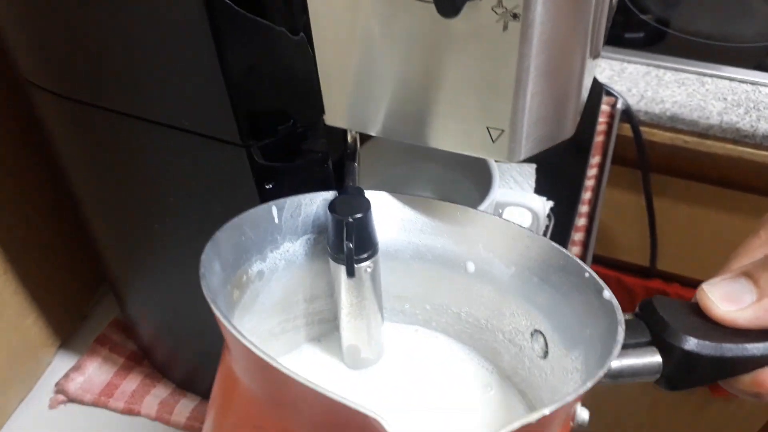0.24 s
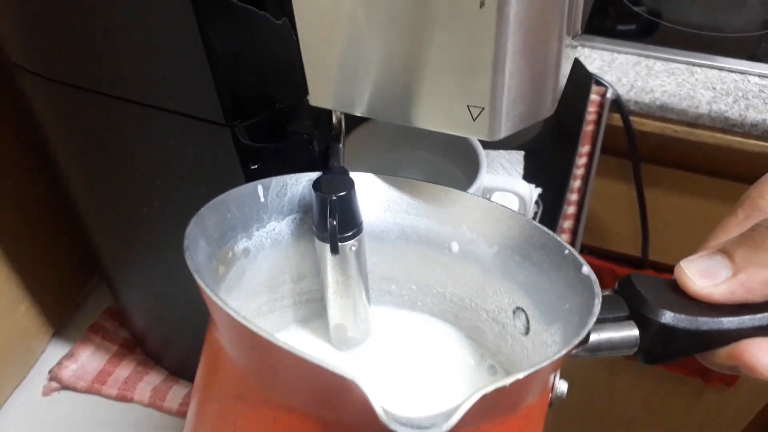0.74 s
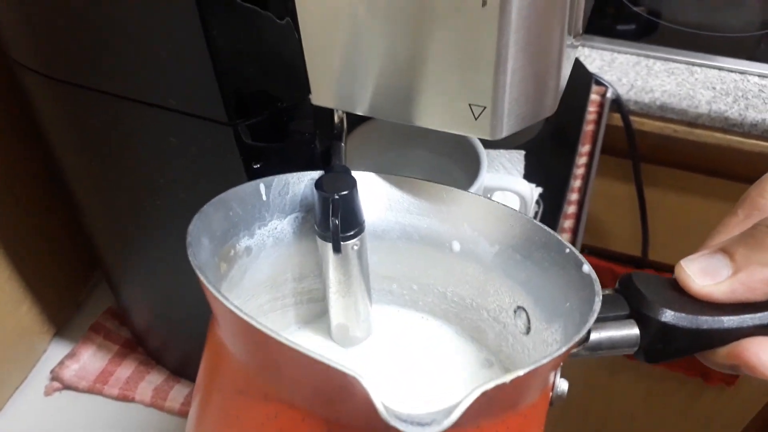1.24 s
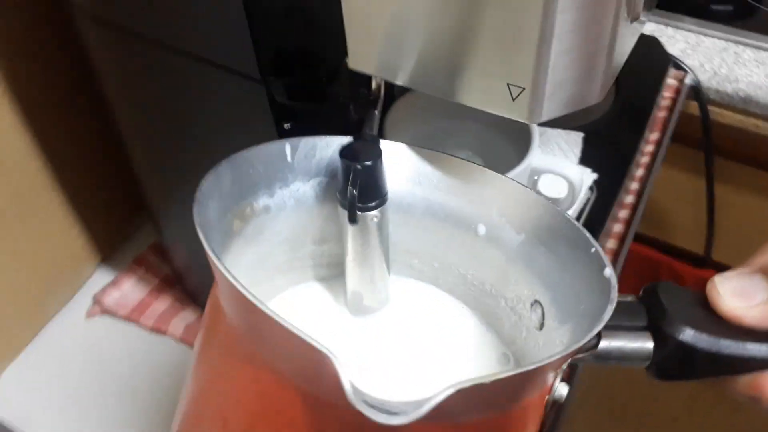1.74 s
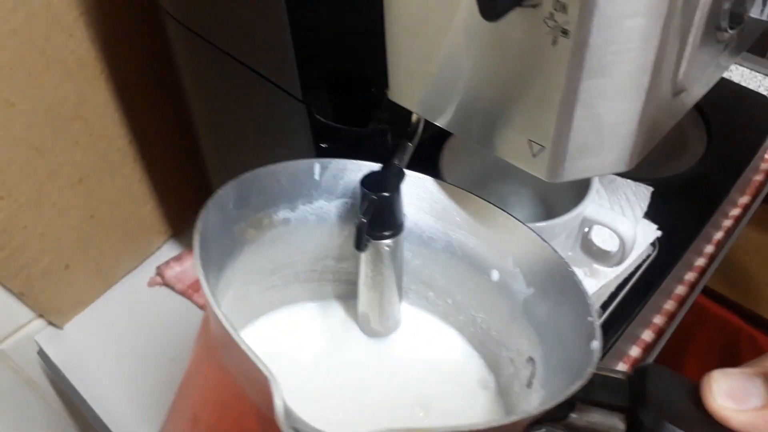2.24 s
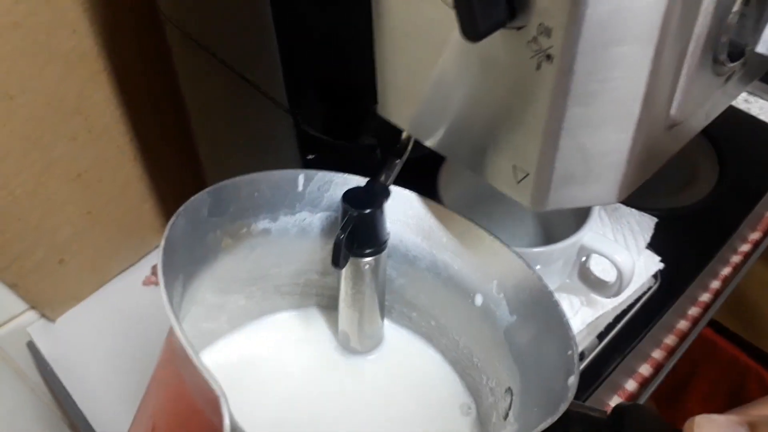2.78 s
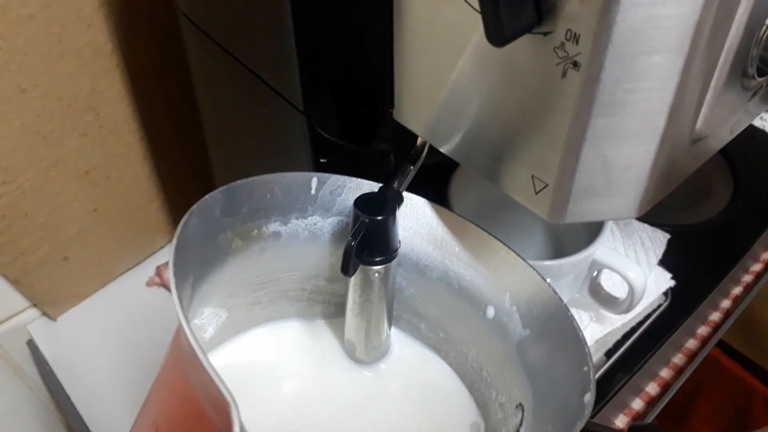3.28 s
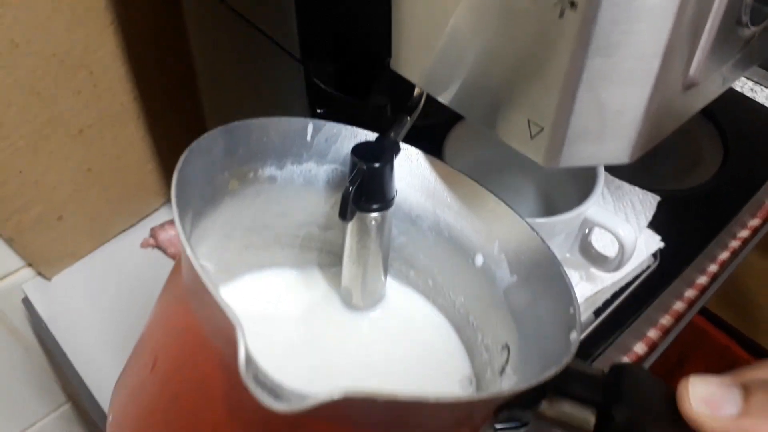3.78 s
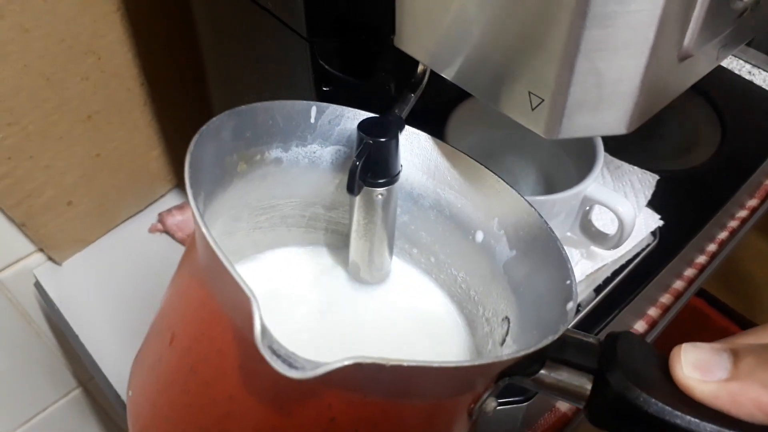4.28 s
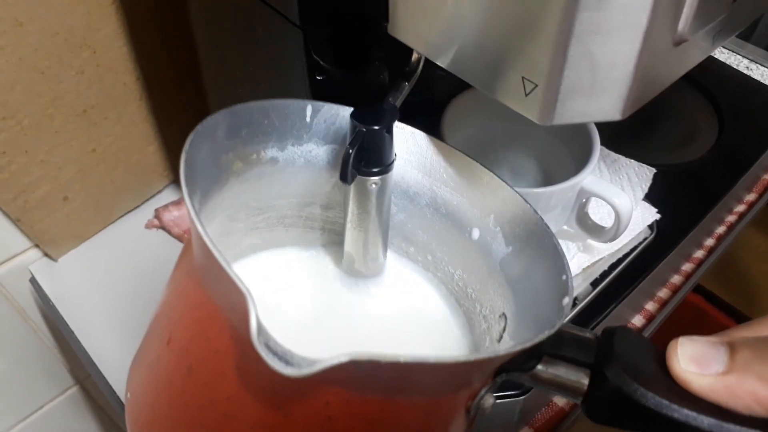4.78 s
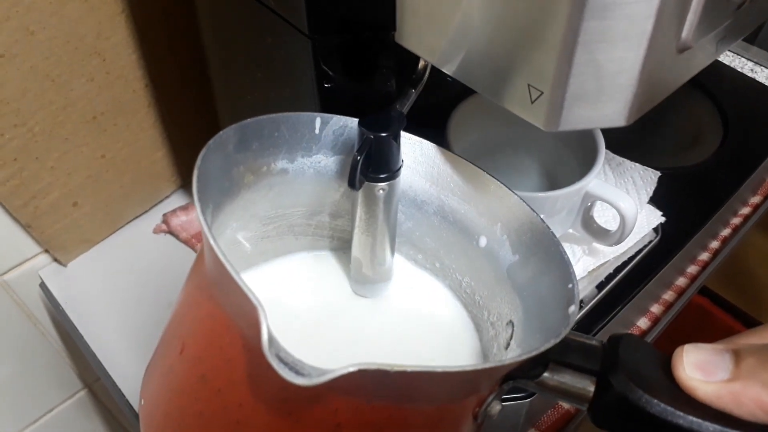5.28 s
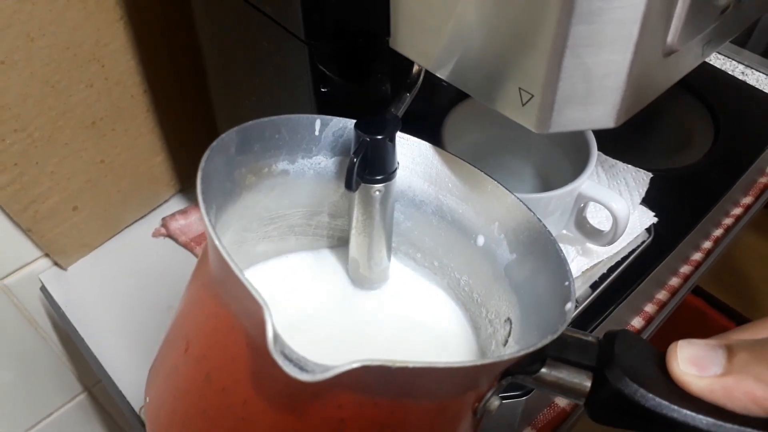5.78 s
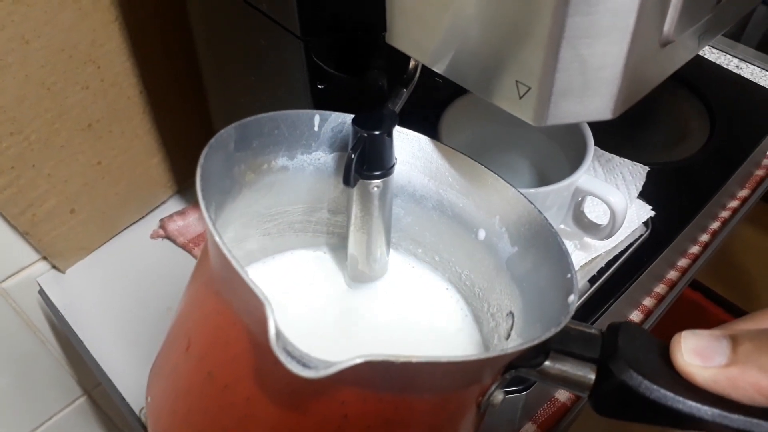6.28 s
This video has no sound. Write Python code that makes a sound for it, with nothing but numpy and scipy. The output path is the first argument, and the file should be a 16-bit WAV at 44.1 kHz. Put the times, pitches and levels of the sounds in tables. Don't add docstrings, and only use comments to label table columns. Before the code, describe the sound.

A steam wand gurgles hollowly and hisses in a metal pot of milk, bubbling loudest around four seconds, then sinking to a quieter fizz.

```python
import sys
import numpy as np
from scipy import signal
from scipy.fft import rfft, irfft, next_fast_len
from scipy.io import wavfile

SR = 44100
rng = np.random.default_rng(int(sys.argv[2]) if len(sys.argv) > 2 else 0)


def volts_from_db(level):
    exponent = np.asarray(level, float) / 20
    return 10 ** exponent


def digitize_waveform(pressure):
    field = np.atleast_2d(pressure).T
    bounded = np.clip(field, -1, 1)
    quanta = np.round(bounded * 32767).astype(np.int16)
    wavfile.write(sys.argv[1], SR, quanta)


N = 287532
TIME_S = np.arange(N) / SR
PADDED = next_fast_len(N + 8192)
BIN_HZ = np.maximum(np.fft.rfftfreq(PADDED, 1 / SR), 10)

# start_s, level_db
CHURN = [(0.0, -31), (3.94, -27), (4.18, -23), (4.9, -32.5), (6.52, -31.5)]
# start_s, cover [0-1]
FOAM = [(0, 0.06), (1.5, 0), (3.7, 0.31), (4.9, 0.55), (5.3, 0.1), (6.0, 0.86), (6.2, 0.25), (6.52, 0.92)]
# centre_s, depth_db, half_length_s
HUSHES = [(1.094, -28, 0.01), (1.31, -14.5, 0.031), (2.144, -13, 0.013), (2.682, -6, 0.024),
          (3.74, -5, 0.029), (3.88, -3, 0.03), (4.402, -10.5, 0.018), (4.745, -14, 0.021),
          (6.059, -15, 0.02), (6.34, -6.5, 0.063), (6.205, -5.5, 0.019)]
# peak_s, peak_db, pitch_hz, t60_s
BREAKING = [(.577, -10.5, 970, 0.028), (.654, -2, 746, 0.058), (.71, -8, 751, 0.051), (.9, -19, 658.4, 0.2),
            (1.208, -6, 693, 0.069), (1.244, -1.5, 712, 0.051), (1.499, -6, 739, 0.066),
            (1.861, -3.5, 703, 0.079), (1.884, -5.5, 675, 0.016), (1.964, -1, 737, 0.034),
            (2.231, -8.5, 682, 0.11), (2.254, -6.5, 893, 0.058), (2.29, -14, 975, 0.12),
            (2.38, -1, 702, 0.051), (2.502, -14, 885, 0.041), (2.843, -8, 709, 0.099),
            (2.984, -19, 962, 0.21), (3.325, -17, 800, 0.13), (3.415, 2.5, 685, 0.02),
            (3.522, -12, 672, 0.039), (3.791, -9.5, 728, 0.15), (3.916, -1, 669, 0.044),
            (3.985, -9, 782, 0.074), (4.121, 4.5, 736, 0.04), (4.298, 3.5, 699, 0.055),
            (4.781, -15.5, 664, 0.13), (4.814, -2, 660, 0.032), (4.86, -1.5, 697, 0.028),
            (4.913, -4.5, 974, 0.03), (6.149, -14, 687, 0.047)]
# peak_s, peak_db, pitch_hz, t60_s
SUNKEN = [(.11, -8.5, 761, 0.13), (.183, -10, 755, 0.017), (.286, 0.5, 675, 0.059),
          (.332, -5.5, 750, 0.062), (.358, -5.5, 750, 0.081), (.466, -14.5, 776, 0.12),
          (.804, -16.5, 726.4, 0.25), (.989, -1, 746, 0.039), (1.039, -7, 724, 0.06),
          (1.078, -8.5, 773, 0.052), (1.334, -14.5, 706.5, 0.23), (1.539, -15.5, 730.5, 0.34),
          (1.692, -7, 818, 0.03), (2.35, -9.5, 613, 0.057), (2.6, -7.5, 723, 0.12), (3.158, -7, 746, 0.033),
          (3.179, -7, 687, 0.075), (3.375, -10, 765, 0.097), (3.395, -5.5, 685, 0.031),
          (3.585, -16, 788, 0.054), (4.171, 0.5, 680, 0.016), (4.228, -6.5, 641, .1),
          (4.541, -18, 611, 0.16), (4.633, -10.5, 698, 0.04), (4.751, -10, 703, 0.034),
          (4.834, -5.5, 772, 0.046), (5.039, -3.5, 710, 0.012), (5.291, -13.5, 628, 0.1),
          (5.8, -7, 630, 0.031), (5.862, -9, 611, 0.051), (6.102, -16, 750, 0.099),
          (6.347, -6.5, 684, 0.014)]
# peak_s, peak_db, pitch_hz
BLIPS = [(0.003, -8, 732), (0.253, -23, 742), (.304, -8, 845), (.447, -15, 714), (1.011, -12, 762),
         (5.272, -20, 694), (1.112, -18, 960), (1.263, -12, 705), (1.383, -9.5, 705), (1.456, -19, 730),
         (2.033, -19, 848), (2.198, -11.5, 863), (2.723, -12, 920), (2.896, -30, 703), (3.575, -13.5, 944),
         (4.42, -17.5, 743), (5.473, -21, 630), (5.518, -17.5, 630), (5.574, -16.5, 659),
         (5.707, -20.5, 603), (5.768, -17, 629), (5.842, -27, 617), (5.924, -17, 720), (5.998, -19, 607),
         (6.407, -18.5, 699)]
# pitch_hz, width_hz, level_db
POT_AIR = [(630, 34, -7), (695.8, 28.4, 1.5), (742.5, 14, -1), (811, 60, -2.5), (858.8, 38, -0.5),
           (939, 80, -7.5), (978.5, 46, -1.5), (1035, 340, -9), (1100, 190, -17.5)]
# pitch_hz, width_hz, level_db
UNDER_FOAM = [(565, 86, -7.5), (566, 88, 0.5), (611, 103, -3)]
# centre_s, level_db
AIR_DIPS = [(.429, -10), (.533, -12), (.784, -14), (1.606, -10.5), (1.947, -12), (2.518, -3),
            (3.141, -9.5), (3.905, -6), (4.2, -6), (4.51, -1), (5.446, -11)]
# pitch_hz, width_hz, level_db
SPLASH = [(1111, 94, 8), (1245, 97, 12), (1224, 660, 15.7), (1600, 97, 12), (1670, 1450, 11.2)]
# pitch_hz, width_hz, level_db
WALL = [(1955, 130, -1.5), (2026, 59, 2), (2141, 82, -6.5)]
# peak_s, peak_db, t60_s
SWIRLS = [(.032, -10, 0.094), (.251, -23, 0.31), (.36, -24, 0.072), (.59, -14, 0.09), (.944, -20, 0.15),
          (1.196, -13.5, 0.13), (1.347, -22, 0.36), (1.812, -14.5, 0.14), (1.916, -8, 0.078),
          (2.2, -25, 0.35), (3.331, -13.5, 0.058), (3.849, -26, 0.33), (5.032, -11, 0.046),
          (5.634, -25, 0.099), (5.773, -20, 0.057)]
# start_s, level_db
FACING = [(0, 0), (1.4, 0), (2.25, -2), (2.4, -8), (3.15, -8), (3.4, -4), (4.4, -4), (6.52, -6)]

# start_s, level_db
STEAM = [(0, -31), (.7, -32), (1.25, -31.5), (2.1, -32.5), (2.5, -32), (3.2, -33.5), (3.7, -34), (4.3, -32),
         (4.45, -37.5), (4.9, -37.5), (5.25, -36.5), (5.75, -37), (6.1, -37), (6.35, -38.5), (6.52, -39)]
# pitch_hz, density_db [dB per Hz]
FIZZ_COLOUR = [(1200, -13.5), (1800, 1), (2500, 3), (3150, 7.5), (3700, 1.5), (4500, 8.5), (5700, -2),
               (6900, 2.5), (7600, 0), (8450, -11), (10300, -7), (12200, -4.5), (14000, -16), (15600, -14)]
# start_s, jump_db, length_s
SPURTS = [
    (4.59, 6, 0.031),
    (4.92, 6.5, 0.266),
    (5.32, 7, 0.051),
    (5.512, 3.5, .15),
    (6.226, 3, 0.072),
]
# peak_s, peak_db
SPUTTERS = [(.107, -21), (.444, -22), (.596, -23), (0.713, -16), (.822, -17), (.954, -11), (1.032, -14),
            (1.151, -24), (1.231, -17), (1.366, -20), (1.558, -19), (2.295, -23), (5.721, -21),
            (5.877, -16.5)]
# peak_s, peak_db
FLICKS = [
    (4.962, -14),
    (4.986, -14),
    (5.166, -25),
]
# centre_s, level_db, half_length_s
TEARS = [(.787, 4, 0.016), (1.826, 2.5, 0.016), (0.478, -4.5, .03), (1.3, -5, 0.012), (2.995, -6, 0.017),
         (5.9, -4, .03), (4.2, -5, 0.045)]
# start_s, place [0 low - 1 high]
RIM = [(0, 0.05), (1.6, 0.13), (2.1, 0.4), (2.9, 0.75), (3.7, 0.61), (4.3, 0.35), (4.9, 0.35), (5.6, 0.15),
       (6.1, 0.18), (6.52, 0.23)]

# pitch_hz, density_db [dB per Hz]
RUMBLE = [(15, -50), (25, -22), (75, -27), (156, -13), (201, 4.5), (246, -18), (301, -3), (374, -3.5),
          (520, 8.5), (680, -34), (1140, -120)]
# pitch_hz, width_hz, level_db
HUM = [(75, 14, -73), (89.5, 2, -63.5), (111, 99, -59.5), (205.5, 13, -59), (316, 27, -58.5)]
# start_s, peak_db, t60_s
BUMPS = [
    (1.39, -35.5, 0.19),
    (1.499, -41.5, 0.29),
    (2.64, -41, 0.21),
]

# peak_s, peak_db, pitch_hz
CRACKLES = [(0.0962, -39, 3220), (0.175, -30, 3410), (0.249, -28, 3130), (0.368, -25, 3210),
            (0.4276, -35, 3240), (0.5003, -47, 3030), (0.6543, -16, 2820), (0.818, -44, 3280),
            (0.9009, -28, 3000), (1.1105, -29, 3160), (1.1677, -25, 3310), (1.436, -21.5, 2900),
            (1.8113, -22, 3400), (1.9415, -20.5, 3020), (2.3176, -21.5, 2880), (2.4004, -27.5, 2980),
            (2.6334, -38, 3440), (2.937, -26.5, 3160), (3.4286, -25, 3270), (3.717, -34, 3240),
            (3.8565, -28, 3170), (4.0971, -25.5, 3130), (4.2911, -33, 2590), (4.8953, -31, 3130),
            (5.5435, -25.5, 3210)]
# peak_s, peak_db, pitch_hz
CHIRPS = [(0.0338, -23, 1750), (0.2912, -28, 1390), (0.3556, -24, 1450), (0.5801, -26, 1180),
          (0.6534, -12.5, 1370), (0.9028, -13.5, 1316), (0.9541, -19, 1270), (1.3862, -16, 1530),
          (1.4949, -16.5, 1150), (1.8128, -20.5, 1590), (1.8766, -19, 1440), (2.2543, -17, 1370),
          (2.4498, -20, 1560), (2.7763, -16, 1550), (2.8422, -5.5, 1570), (2.982, -16, 1120),
          (3.1542, -19, 1610), (3.225, -26, 1740), (3.27, -22, 1560), (3.3353, -17, 1115),
          (3.3952, -12.5, 1560), (3.4595, -14.5, 1400), (3.5143, -17, 1100), (3.7907, -16, 1140),
          (3.8487, -12.5, 1370), (3.921, -27, 1120), (3.9913, -16, 1140), (4.0726, -26, 1140),
          (4.124, -14, 1310), (4.2203, -26, 1360), (4.2956, -33, 1350), (4.794, -19, 1260),
          (4.8554, -19, 1260), (4.8938, -16.5, 1450), (5.715, -22, 1130), (6.1508, -19.5, 1140)]
# peak_s, peak_db, pitch_hz
TINKLES = [(0.0458, -24, 2120), (0.1685, -15.5, 2130), (0.2414, -32, 2550), (0.293, -27, 2440),
           (0.655, -18, 2720), (1.385, -18, 2510), (1.8726, -26, 2200), (2.1899, -24, 2300),
           (2.435, -18, 2440), (2.773, -26, 2480), (3.1537, -19, 2176), (3.2515, -15, 2190),
           (3.455, -20, 2470), (3.5952, -15, 2230), (3.7419, -31, 2300), (3.7903, -17.5, 2280),
           (3.8565, -26, 2350), (3.922, -15, 2360), (4.136, -11.5, 2160), (4.3824, -21, 2210),
           (4.821, -24, 2480), (4.8983, -19.5, 2440), (5.3263, -26, 2450), (5.6331, -20, 2200),
           (6.2547, -26, 2550)]
# peak_s, peak_db, pitch_hz
TRILLS = [(0.107, -16, 1000), (0.285, -23, 880), (0.578, -15, 1012), (0.653, -22, 865), (0.707, -9, 973),
          (0.903, -10, 950), (1.036, -27, 966), (1.111, -21, 1000), (1.332, -35, 950), (1.456, -13, 950),
          (1.873, -11, 840), (2.188, -27, 861), (2.253, -4, 940), (2.293, -23, 950), (2.717, -11, 970),
          (2.895, -20, 920), (2.984, -15, 930), (3.156, -13, 986), (3.521, -20, 885), (3.573, -23, 950),
          (3.788, -13.5, 900), (3.915, -7.5, 906), (4.228, -17, 861), (4.297, -10, 870), (4.913, -15, 1020),
          (5.767, -28, 1090)]
# peak_s, peak_db, pitch_hz
GLUGS = [(0.103, -21, 610), (1.573, -24, 595), (1.87, -20, 633), (2.223, -14, 618), (2.348, -18.5, 610),
         (2.602, -25, 565), (3.813, -22, 580), (4.125, -30, 567), (4.297, -16, 594), (4.538, -24, 580),
         (4.631, -26, 577), (5.037, -25, 604), (5.653, -20, 614), (5.704, -24, 580), (5.774, -23, 580),
         (5.843, -14.5, 607), (6.347, -25, 583), (6.491, -19, 590),
         (0.115, -33, 430), (1.499, -31, 435), (1.615, -34, 385), (1.87, -29, 412), (2.228, -33, 428),
         (2.351, -33.5, 409), (2.768, -35, 400), (3.179, -34.5, 323), (3.798, -32, 323),
         (4.172, -35.5, 416),
         (0.019, -35.5, 403), (.3, -30, 594), (.82, -17, 980), (.86, -27, 980), (4.622, -30.5, 320),
           (4.94, -37, 318), (5.979, -25, 1110)]
# start_s, peak_db, pitch_hz
SPITS = [(0.295, -21, 3070), (0.387, -17.5, 4340), (0.4352, -15, 4230), (0.689, -19, 3070),
         (0.896, -16, 3900), (5.034, -13, 4600), (2.161, -20, 4660), (2.4234, -21.5, 3020),
         (5.049, -22.5, 4600), (5.105, -20.5, 4900), (3.5314, -23, 3000), (3.652, -24, 5000),
         (3.767, -18.5, 4500), (5.176, -18, 4750), (4.5308, -27, 3350), (4.986, -17, 4700),
         (4.784, -25, 4370), (4.93, -23, 4900), (5.021, -10, 4450), (5.08, -16.5, 4750), (5.141, -15, 4730),
         (5.257, -25.5, 5000), (5.542, -21, 4600), (6.2286, -22.5, 4410)]

# pitch_hz, share [0-1]
DIRECT = [(300, .92), (700, .95), (1300, .8), (2000, .55), (5000, .42), (15000, .25)]
# pitch_hz, left_minus_right_db
SHADE = [(60, 1), (330, 3), (720, 2.5), (950, 7), (1400, 5), (2020, 11), (2500, 4), (3150, 6), (3800, -2),
         (4800, -10), (5750, 10), (7500, 0), (12300, -10), (15300, 5)]
# pitch_hz, angle_rad
LEAD = [(0, 0), (260, .3), (950, 1), (1290, .8), (1800, 1.4), (2150, 2.9), (2330, 6.5), (2700, 6.4),
        (3100, 7), (4130, 8.5), (5770, 13.4), (6800, 14.5), (8100, 15.5), (10200, 19.8), (11800, 25.7),
        (15300, 28.8)]


def rms_one(x):
    return x / np.sqrt(np.mean(x ** 2) + 1e-20)


def in_time(rows):
    return np.interp(TIME_S, *np.transpose(rows))


def at_hz(points, hz):
    pitch_hz, value = np.transpose(points)
    return np.interp(np.log(hz), np.log(pitch_hz), value)


def drift(rate_hz):
    r = np.exp(-80 * np.pi * rate_hz / SR)
    noise = rng.standard_normal(N // 40 + 2002)
    slow = signal.lfilter([1], [1, -2 * r, r * r], noise)[2000:]
    return np.interp(np.arange(N) / 40, np.arange(len(slow)), rms_one(slow))


def resonance(x, hz, width_hz):
    r = np.exp(-np.pi * width_hz / SR)
    zeros = np.array([1, 0, -1]) * (1 - r * r) / 2
    return signal.lfilter(zeros, [1, -2 * r * np.cos(2 * np.pi * hz / SR), r * r], x)


def grains(per_s, spread_db):
    sizes = volts_from_db(spread_db * np.minimum(rng.exponential(1, (2, N)), 3))
    signs = rng.choice([-1, 1], (2, N))
    return sizes * signs * (rng.random((2, N)) < per_s / SR) + 1e-18


def stereo(pair, hz):
    alike = np.clip(at_hz(DIRECT, hz), 0, 1)
    return np.array([pair[0], alike * pair[0] + np.sqrt(1 - alike ** 2) * pair[1]])


def modes(drive, table, patchy_db, tilt_db=0):
    out = 0
    for k, (hz, width_hz, level_db) in enumerate(table):
        rung = resonance(stereo(drive, hz), hz, 3.0 * width_hz)
        rung = resonance(rung, hz, width_hz) * np.sqrt(SR / (2 * width_hz))
        gain = volts_from_db(level_db + tilt_db * np.log2(hz / 620) + patchy_db * drift(11.0))
        out = out + (-1) ** k * gain * rung
    return out / np.sqrt(np.sum(volts_from_db(np.array(table)[:, 2]) ** 2))


def bursts(times, levels_db, t60s, rise_s):
    out, age = np.zeros(N), np.arange(int(.3 * SR)) / SR
    for s, level_db, t60 in zip(times, levels_db, t60s):
        shape = (1 - np.exp(-age / rise_s)) * volts_from_db(level_db - 60 * age / t60)
        start = int(s * SR)
        out[start:start + len(age)] += shape[:N - start]
    return out


def puffs(table, gain_db, rise_s):
    s, peak_db, t60 = np.transpose(table)
    return bursts(np.maximum(s - rise_s, 0), peak_db + gain_db, np.clip(t60, .01, .3), rise_s)


def bells(table):
    return sum(db * np.exp(-((TIME_S - s) / half) ** 2) for s, db, half in table)


def lulls(times, depth, lead_s):
    marks = np.zeros(N)
    marks[(np.maximum(times - lead_s, 0) * SR).astype(int)] = 1
    bell = np.hanning(int(2 * lead_s * SR))
    return 1 - np.clip(depth * signal.fftconvolve(marks, bell, "same"), 0, .9)


def pocket_tones(s, peak_db, pitch_hz, t60):
    tones, age = np.zeros(N), np.arange(int(.15 * SR)) / SR
    for at, level_db, hz, fade in zip((s * SR).astype(int), peak_db, pitch_hz, t60):
        swell = (1 - np.exp(-age / 0.0035)) * volts_from_db(level_db - 3.5 - 60 * age / (1.61 * fade))
        tone = swell * np.sin(2 * np.pi * hz * age * (1 - 0.5 * age))
        tones[at:at + len(age)] += tone[:N - at]
    return tones


def pot_air(s, peak_db, pitch_hz, t60, churn_db):
    foam = in_time(FOAM)
    surge = volts_from_db(churn_db - 1.0 + 0.5 * drift(17.0)) * lulls(s, depth=0.26, lead_s=0.012)
    collapses = surge * rms_one(grains(700., 4.24))
    collapses += bursts(s, peak_db - 1.5, 0.67 * t60, rise_s=0.0094) * rng.standard_normal((2, N))
    collapses[:, (s * SR).astype(int)] += volts_from_db(peak_db + 3.5)
    air = modes(collapses, POT_AIR, patchy_db=4.0, tilt_db=2 - 20 * foam)
    air = air + pocket_tones(s, peak_db, pitch_hz, t60)
    air = air + modes(collapses * volts_from_db(-25 + 34 * foam), UNDER_FOAM, patchy_db=-1.5)
    return air * volts_from_db(bells([(*row, 0.013) for row in AIR_DIPS]))


def splash(s, spill_db, t60, churn_db, small):
    gain = bursts(s, spill_db - 23, 1.33 * t60, rise_s=0.0034) + volts_from_db(churn_db - 14)
    return modes(gain * small, SPLASH, patchy_db=0.5)


def pot_wall(churn_db, small):
    swirl = volts_from_db(churn_db - 6 + in_time(FACING)) + puffs(SWIRLS, -0.91, rise_s=0.015)
    return modes(swirl * volts_from_db(1.5 * drift(25.0)) * small, WALL, patchy_db=2.2)


def gurgle():
    churn_db = in_time(CHURN) + bells(HUSHES)
    blips = [(*row, 0.089) for row in BLIPS]
    s, peak_db, pitch_hz, t60 = np.transpose(BREAKING + SUNKEN + blips)
    s = np.maximum(s - .003, 0)
    below_surface = np.arange(len(s)) >= len(BREAKING)
    spill_db = 0.43 * peak_db - 7.5 * below_surface
    small = rms_one(grains(1200., 5.7))
    out = pot_air(s, peak_db, pitch_hz, t60, churn_db)
    out = out + splash(s, spill_db, t60, churn_db, small) + pot_wall(churn_db, small)
    thump = rms_one(resonance(rng.standard_normal(N), 417, 120))
    return out + thump * bursts(s, spill_db - 27.5, 1.3 * t60, rise_s=0.024)


def spurts_db():
    rise_s, fall_s, total = 0.0028, 0.016, 0
    for s, jump_db, hold in SPURTS:
        sinking = np.exp(-np.maximum(TIME_S - s - hold, 0) / fall_s)
        total = total + jump_db * np.clip((TIME_S - s) / rise_s, 0, 1) * sinking
    return total


def past_rim(spectrum, spurt_db):
    place = np.clip(in_time(RIM), 0, 1) * 2
    filled = np.clip(.1 * spurt_db, 0, 1)
    out = filled * irfft(spectrum, PADDED)[:, :N]
    for k, notch_hz in enumerate(np.geomspace(8250, 9250, 3)):
        dip = volts_from_db(-9 * np.exp(-.5 * (np.log2(BIN_HZ / notch_hz) / .055) ** 2))
        near = np.clip(1 - abs(place - k), 0, 1)
        out += (1 - filled) * near * irfft(spectrum * dip, PADDED)[:, :N]
    return out


def fizz_levels(foam, spurt_db):
    steam_db = in_time(STEAM)
    sway_db = 1.32 * drift(14.0) + bells(TEARS)
    crackle = puffs([(s, db, 0.15) for s, db, hz in CRACKLES], -14.0, rise_s=0.0035)
    low_db = 20 * np.log10(volts_from_db(steam_db - 1 + 1.5 * foam) + crackle) + 0.3 * bells(HUSHES)
    high_db = steam_db + 3.5
    water = puffs([(*row, 0.071) for row in SPUTTERS], -4.0, rise_s=0.0033)
    water = water + puffs([(*row, 0.026) for row in FLICKS], -8.0, rise_s=.001)
    jet_db = 20 * np.log10(volts_from_db(steam_db - 0.5 + 1.5 * foam) + water)
    return low_db + 0.13 * spurt_db + sway_db, high_db + spurt_db + sway_db, jet_db + 0.81 * spurt_db


def fizz():
    foam, spurt_db = in_time(FOAM), spurts_db()
    low_db, high_db, jet_db = fizz_levels(foam, spurt_db)
    pops, dealt = grains(5000., 5.6), rng.integers(0, 20, N)
    white, sputter, out = rng.standard_normal((2, 2, N)), drift(62.0), np.zeros((2, N))
    for k, hz in enumerate(np.geomspace(1300, 15500, 20)):
        drive = rms_one(pops * (dealt == k)) * 0.5 + white[k % 2] * 0.95
        band = resonance(stereo(drive, hz), hz, 0.22 * hz)
        band = rms_one(resonance(band, hz, 0.21 * hz))
        if hz < 3600:
            level_db, patchy_db = low_db - 3.5, 2.9
        elif hz < 8400:
            level_db, patchy_db = high_db - 3.5, 2.2
        else:
            level_db, patchy_db = jet_db - 0.5 + 0.2 * sputter, 2.2
        ridge_db = 5.5 * (foam - .5) * np.exp(-(4 * np.log2(hz / 5300)) ** 2)
        wander_db = patchy_db * drift(16.0) + 0.98 * drift(1.47)
        out += np.sqrt(hz / 4000) * volts_from_db(level_db + ridge_db - 8.0 + wander_db) * band
    return past_rim(rfft(out, PADDED) * volts_from_db(at_hz(FIZZ_COLOUR, BIN_HZ)), spurt_db)


def room_rumble():
    noise = rng.standard_normal((2, PADDED))
    mid, side = irfft(rfft(noise) * volts_from_db(at_hz(RUMBLE, BIN_HZ)), PADDED)[:, :N]
    return volts_from_db(-51 - 3.0) / np.std(mid) * (mid + 0.59 * side * [[1], [-1]])


def appliance_hum():
    lines = sum(volts_from_db(db + 1.5) * rms_one(resonance(rng.standard_normal(N), f, w)) for f, w, db in HUM)
    turn, motor_hz, beat_hz = 2 * np.pi * TIME_S, 58.2, .955
    swell = 1 + .6 * np.cos(turn / 5.3)
    motors = np.sin(motor_hz * turn) + .85 * np.sin((motor_hz + beat_hz) * turn)
    return lines + volts_from_db(-64.0) * swell * motors


def handle_bumps():
    s, peak_db, t60 = np.transpose(BUMPS)
    thud = rms_one(resonance(rng.standard_normal(N), 97, 120))
    return thud * bursts(s, peak_db + 4.0, t60, rise_s=0.012)


def kitchen_floor():
    return (room_rumble() + appliance_hum() + handle_bumps()) * volts_from_db([[.6], [-.6]])


def ringing_bubbles(table, gain_db, rise_s, t60, width):
    out, age = np.zeros((2, N + 4000)), np.arange(4000) / SR
    swell = (1 - np.exp(-age / rise_s)) * volts_from_db(gain_db - 60 * age / t60)
    for (s, level_db, hz), puff in zip(table, rng.standard_normal((len(table), 2, len(age)))):
        at = int(max(s - rise_s, 0) * SR)
        rung = resonance(stereo(puff, hz), hz, width * hz)
        rung = rms_one(resonance(rung, hz, 3 * width * hz))
        out[:, at:at + len(age)] += volts_from_db(level_db) * swell * rung
    return out[:, :N]


def froth():
    large = ringing_bubbles(GLUGS, gain_db=0.5, rise_s=0.0058, t60=0.11, width=0.048)
    middle = ringing_bubbles(CHIRPS + TINKLES + TRILLS, gain_db=-1.5, rise_s=0.002, t60=0.056, width=0.045)
    return large + middle + ringing_bubbles(CRACKLES, gain_db=0.5, rise_s=0.011, t60=0.15, width=0.017)


def spits():
    out, age = np.zeros(N), np.arange(900) / SR
    for (s, level_db, hz), puff in zip(SPITS, rng.standard_normal((len(SPITS), len(age)))):
        at = int(s * SR)
        swell = (1 - np.exp(-age / 0.00014)) * volts_from_db(level_db + 1.5 - 60 * age / 0.026)
        drop = swell * rms_one(resonance(puff, hz, 0.07 * hz))
        out[at:at + len(age)] += drop[:N - at]
    return out


def to_microphones(x):
    shade = volts_from_db(at_hz(SHADE, BIN_HZ) * np.array([[.5], [-.5]]))
    angle = np.interp(BIN_HZ, *np.transpose(LEAD))
    lag = np.exp(-1j * angle * np.array([[0], [1]]))
    return irfft(rfft(x, PADDED) * shade * lag, PADDED)[:, :N]


def scene():
    return to_microphones(gurgle() + fizz() + froth() + spits()) + kitchen_floor()


def band_limit(x):
    return signal.sosfilt(signal.butter(12, 15650, fs=SR, output="sos"), x)


def record(dry):
    rounded = .95 * np.tanh(dry / .95)
    return band_limit(rounded)


dry = scene()
out = record(dry)
digitize_waveform(out)
```